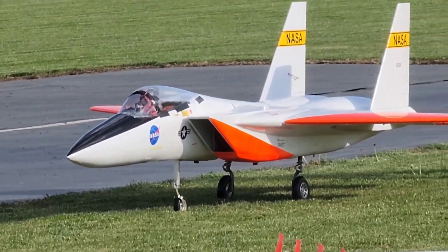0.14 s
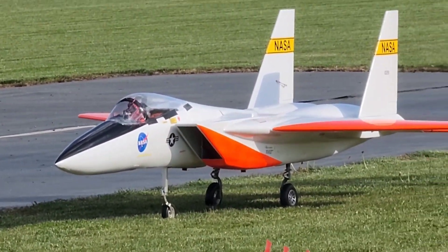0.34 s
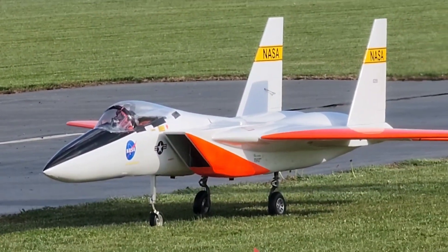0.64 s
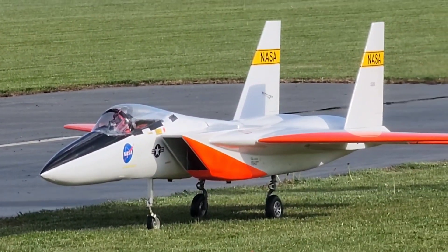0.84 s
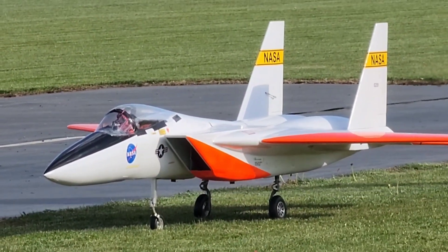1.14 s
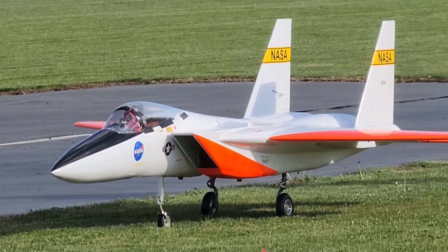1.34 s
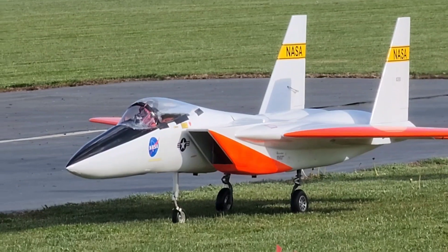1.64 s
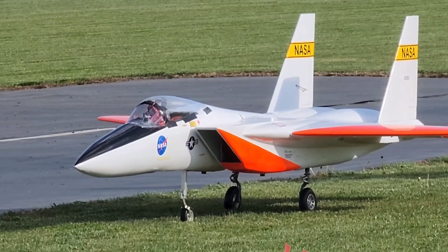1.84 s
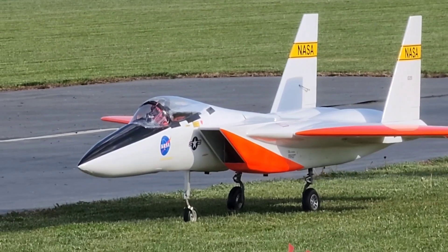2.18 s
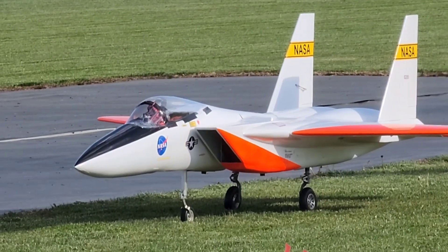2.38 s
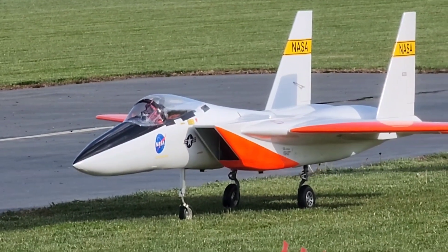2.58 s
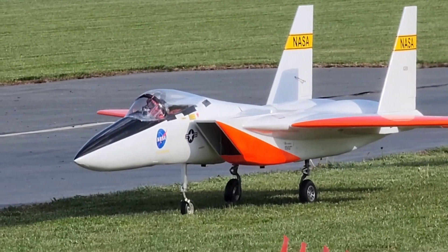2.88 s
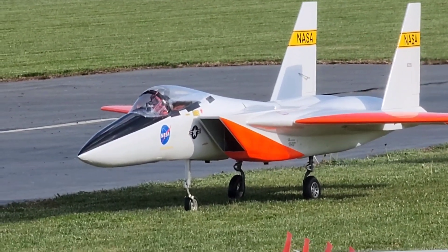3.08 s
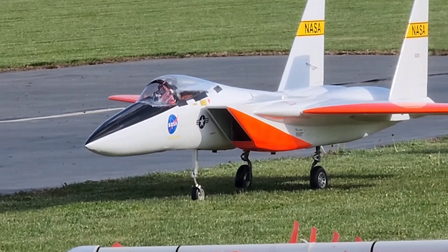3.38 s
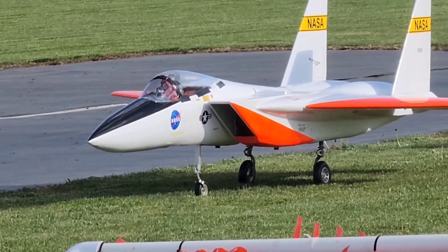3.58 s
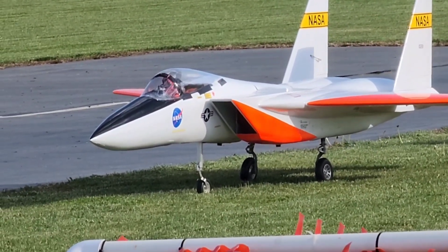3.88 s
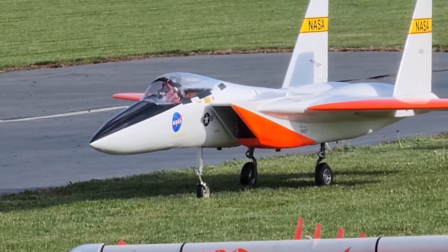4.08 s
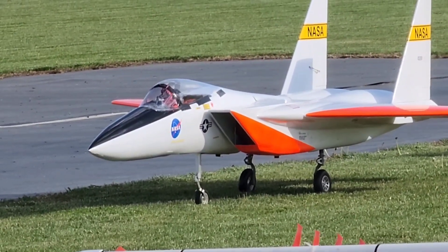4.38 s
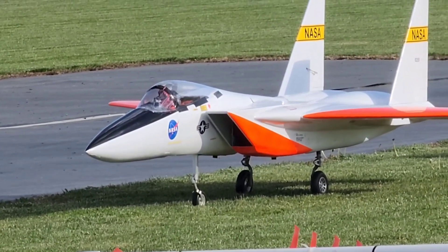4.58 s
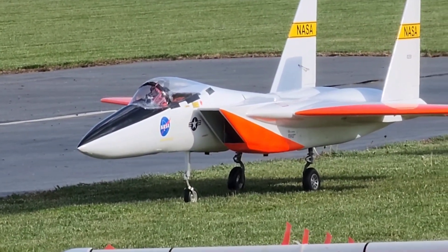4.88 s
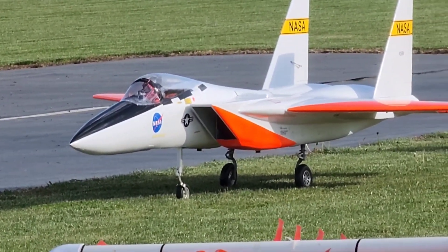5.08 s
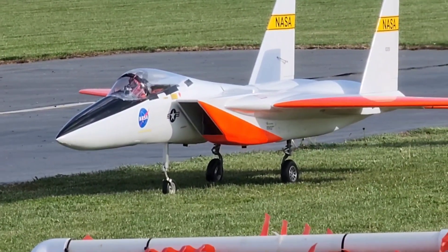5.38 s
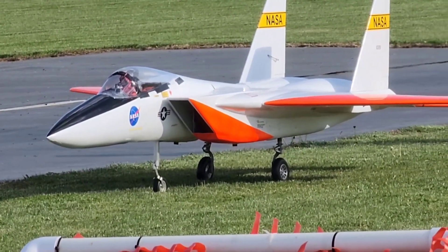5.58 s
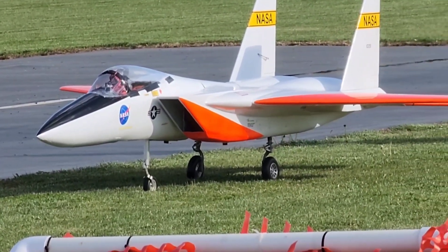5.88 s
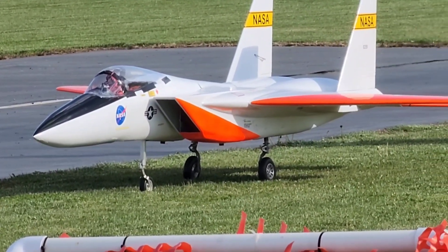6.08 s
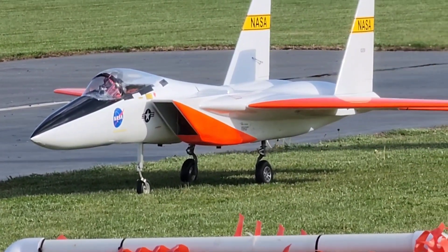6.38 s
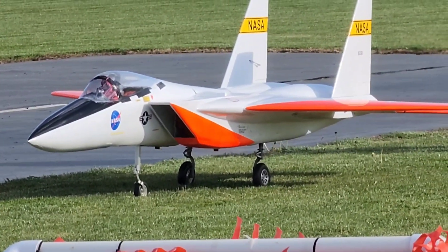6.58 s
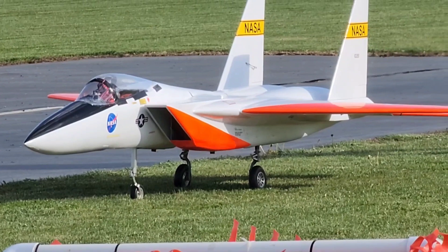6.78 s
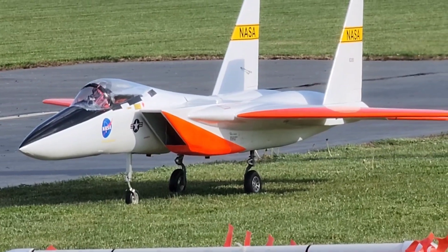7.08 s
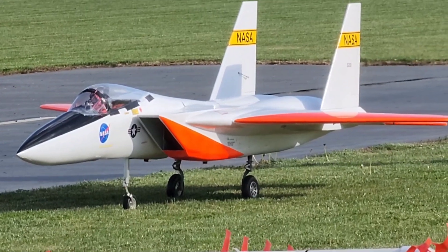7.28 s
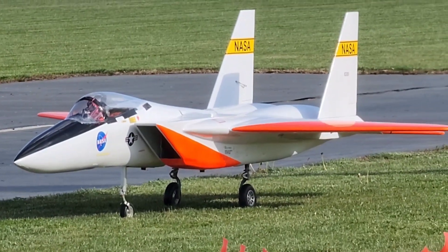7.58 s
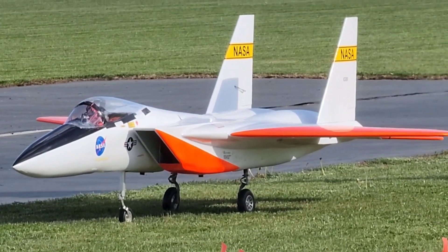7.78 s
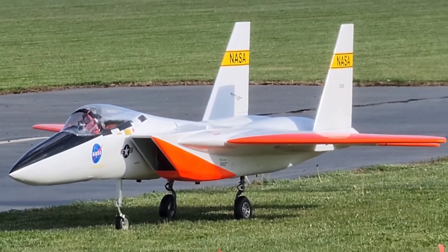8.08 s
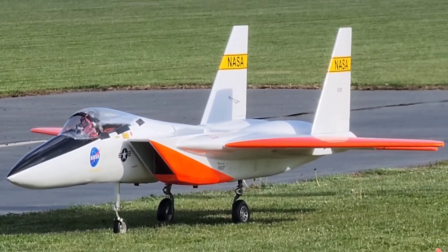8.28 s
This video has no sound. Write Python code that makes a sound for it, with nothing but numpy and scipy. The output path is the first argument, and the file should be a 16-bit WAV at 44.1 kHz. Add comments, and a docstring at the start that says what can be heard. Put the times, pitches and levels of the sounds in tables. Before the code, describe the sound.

Continuous small-turbine noise outdoors: a piercing, wavering high whine, dipping slightly then slowly creeping upward, above breathy roar and hiss. A light breeze quickly gives way to repeated gusts that batter the handheld stereo microphone with deep, ragged flutters and thuds, mostly on the right. A weak low hum wavers underneath. No start or stop; the jet stays at steady power.

```python
"""Twin-turbine model jet at taxi power

A jet on an airfield, heard through the two ports of a hand-held stereo microphone.
Two blade-passing tones near 11 kHz drift past each other and beat, over filtered-noise exhaust rush.
Noise gusts, buffets and short eddies shake the ports; low wavering harmonics form a generator hum.
"""
import sys
import numpy as np
from scipy import signal
from scipy.fft import rfft, irfft
from scipy.io import wavfile
from scipy.ndimage import uniform_filter1d, minimum_filter1d, map_coordinates

SR = 44100
rng = np.random.default_rng(int(sys.argv[2]) if len(sys.argv) > 2 else 0)


def to_wav(sig):
    """Store sig (one row per channel, or 1-D mono) as 16-bit WAV at the path in sys.argv[1].

    Samples outside -1..1 are clipped; the rate is SR.
    """
    pcm = np.clip(np.atleast_2d(sig), -1, 1) * 32767
    pcm = np.round(pcm).astype(np.int16)
    wavfile.write(sys.argv[1], SR, pcm.T)  # frames by channels


N = 372204
TIME_S = np.arange(N) / SR
FREQS_HZ = np.fft.rfftfreq(N, 1 / SR)

# Mean blade-passing tone, first and second turbine: (time [s], frequency [Hz])
BLADE_TONE_A = [(0, 10790), (.38, 10720), (.6, 10745), (.85, 10805), (1.5, 10905), (2.05, 10964),
                (2.6, 10983), (3.0, 10974), (3.28, 10952), (4.05, 10961), (4.4, 10972), (5.7, 11030),
                (6.3, 11066), (6.9, 11092), (7.5, 11092), (8.3, 11107), (8.44, 11150)]
BLADE_TONE_B = [(0, 10878), (.6, 10838), (1.03, 10822), (1.5, 10885), (2.1, 10947), (2.5, 10973),
                (3.4, 10984), (3.9, 10963), (4.8, 10948), (5.35, 10968), (6.3, 10984), (7.5, 10970),
                (8.3, 10988), (8.44, 11035)]
# Narrow whistle beam swinging over the ports, before trim and flutter:
# (time [s], left level [dB], right level [dB], phase lead of left port [rad])
BEAM_A = [(0, -33, -35, -2.5), (.35, -41, -38, 1.5), (.6, -23, -25, -3), (1.2, -37, -30, -1.5),
          (1.6, -27, -29.5, -0.5), (2.25, -24.5, -26, -3), (2.7, -20.5, -28, -1.9), (3.02, -34.5, -24, 0.5),
          (3.62, -17.5, -26, -2.4), (4.0, -41, -28, -1.5), (4.5, -19.5, -32, -2), (5.1, -32.5, -25, 1.5),
          (5.6, -25, -22.5, -0.3), (6.3, -20.5, -31, -2.2), (7.7, -10.5, -21, -1.8), (8.15, -21, -30, 3.3),
          (8.44, -21, -18, 1.3)]
BEAM_B = [(0, -34.5, -26, -2.5), (.4, -33, -24.5, -1.4), (.72, -28.5, -19, 0.9), (1.05, -37, -27, -0.2),
          (1.65, -30, -30, -1.9), (2.05, -21, -34, -2.5), (2.5, -32, -32, -2.5), (2.9, -28.5, -32, 1.5),
          (3.6, -27, -41, -1), (3.95, -21.5, -25.5, -.6), (4.3, -28, -40, -0.5), (5.5, -25.5, -24, -2),
          (6.4, -27.5, -29, -2.1), (7.25, -49, -47, -0.5), (7.9, -26.5, -27, -3.5), (8.44, -22.5, -30, 2)]
# First turbine's weaker tones, left port: (time [s], half-blade tone [dB], each tone above blade tone [dB])
SHAFT_LEVEL = [(0, -50, -62), (.4, -45, -60), (1.0, -52, -59), (1.8, -52, -53), (4.2, -48.5, -43),
               (5.5, -47, -59), (7.6, -36, -55), (8.44, -37.5, -58)]
# Intake and tailpipe resonances: (centre [Hz], width scale [Hz], left peak [dB per Hz], right peak [dB per Hz])
DUCTS = [(192, 205, -61, -60), (875, 165, -59, -59), (1396, 54, -54.5, -55.5), (1503, 187, -60.5, -67),
         (2017, 310, -59, -65.5), (2393, 152, -60, -82), (2890, 178, -60.5, -66), (3092, 120, -61, -69.5),
         (3398, 193, -63.5, -63.5), (3955, 290, -67, -67.5), (4384, 99, -70, -67), (4890, 430, -67.5, -70),
         (5565, 220, -66, -67.5), (6200, 460, -65.5, -63), (6620, 250, -63, -71.5),
         (7260, 390, -64.5, -61.5), (7885, 550, -70.5, -69.5), (9130, 220, -75, -75.5),
         (11650, 370, -73, -78.5), (12900, 370, -82, -92)]
# Broad jet rush under the resonances: (frequency [Hz], left density [dB per Hz], right density [dB per Hz])
RUSH = [(100, -53.5, -56.5), (500, -72, -73.5), (1536, -61.5, -61.5), (4000, -102, -96), (8500, -98, -81.5),
        (10100, -78, -78.5), (13030, -72.5, -72), (13900, -79, -94), (15900, -88, -92)]
# Slow swell of jet noise: (time [s], low growl [dB], exhaust roar [dB], intake hiss [dB])
FLOW = [(0, 3, 2.5, 0.8), (.28, -1, 5, -0.2), (.75, 0.5, -0.5, 3), (1.1, .6, 3, 0.5), (1.35, 2, -1.2, 0.4),
        (2.3, 1, -.5, -2), (3.0, 2, 0.4, 1), (3.6, 0.5, -0.5, -0.6), (4.25, 0.7, -.2, -0.6),
        (4.75, 1, 1.5, 0.9), (5.45, -1, 0, -1), (6.15, -0.5, -0.8, 0.5), (6.75, -1.5, 0.3, -0.3),
        (7.3, -0.5, -0.5, -0.5), (7.75, -2, 3.5, 2.5), (8.44, -0.5, 2.5, 1)]
# Correlation of jet noise between ports: (frequency [Hz], likeness [0-1])
JET_LIKENESS = [(100, 0.68), (500, 0.79), (900, 0.8), (1700, 0.59), (2200, 1), (2650, 0.47), (3400, 0.82),
                (4300, 0.92), (5300, 0), (6200, 0.86), (7400, 0.94), (8800, 0.5), (12000, 0.05),
                (15000, 0.3)]
# Jet noise phase: (frequency [Hz], lead of left port [rad])
JET_LEAD = [(200, -0.63), (700, -0.034), (1080, 2.07), (1400, 0.68), (1750, 1.32), (2300, 0.4),
            (3050, -1.56), (3450, -0.79), (4200, -0.099), (5000, -1.2), (6000, -0.3), (7300, -0.52),
            (9000, 2.1), (13500, 0.029)]
# Generator harmonics, relative: (multiple of generator frequency [-], level [dB])
HUM = [(1, -36), (2, -29.5), (3, -48.5), (4, -63), (5, -50)]
# Generator swell, added to the harmonics: (time [s], gain [dB])
HUM_SWELL = [(0, -4), (.7, -5.5), (1.6, -2), (2.7, -4), (3.5, 5), (5, 5), (6.3, 6.5), (7.2, -1), (8.44, 5)]
# Gusts, before wind trim: (start [s], end [s], left level [dB], right level [dB])
GUSTS = [(0.774, 1.4, -16.5, -23), (1.84, 2.35, -15, -17.5), (3.16, 5.068, -17.5, -16.5),
         (5.04, 5.81, -19.5, -19), (5.89, 7.098, -17, -17.5), (7.353, 8.6, -16, -21)]
# Flow breaking away at the windward right port within a gust: (start [s], end [s], level [dB])
BUFFETS = [(0.838, .92, -14), (1.02, 1.134, -9.5), (1.94, 2.106, -8), (2.173, 2.27, -10),
           (3.157, 3.35, -17.5), (3.511, 3.864, -7.5), (4.082, 4.48, -9), (4.578, 4.894, -10.5),
           (4.988, 5.05, -12), (5.46, 5.538, -10.5), (5.607, 5.702, -8.5), (6.052, 6.147, -14.5),
           (6.489, 6.597, -10.5), (6.695, 6.807, -9.5), (6.842, 7.057, -9.5), (7.307, 7.447, -7.5),
           (7.605, 7.715, -7), (7.77, 7.937, -7), (7.99, 8.12, -10), (8.293, 8.398, -6)]
# Wind colour, relative: (frequency [Hz], left density [dB per Hz], right density [dB per Hz])
WIND_COLOUR = [(12, -36, -25), (25, -31, -13), (40, -5.5, -3), (55, 2.5, .5), (101.5, -3, 4),
               (155, -7.5, -3.5), (216, -22.5, -14.5), (322, -24.5, -22), (388, -43, -34.5),
               (600, -45.5, -40), (1200, -64, -64), (3000, -85, -84)]
# Strong brief eddies, before trim: (centre time [s], length [s], left level [dB], right level [dB])
EDDIES = [(1.012, 0.087, -30, -17), (1.387, 0.076, -39, -28), (1.939, .034, -22, -7.5),
          (2.334, .022, -25, -36), (3.172, .04, -33, -26), (3.706, 0.058, -28, -16),
          (4.727, 0.045, -34, -20.5), (6.864, 0.037, -33, -21), (7.393, 0.083, -38, -20.5),
          (7.45, 0.015, -27, -15), (7.62, .037, -33, -16), (7.835, .019, -28, -18),
          (8.048, 0.053, -32, -16), (8.297, .04, -31, -16.5)]
# Eddy colour, relative: (frequency [Hz], density [dB per Hz])
EDDY_COLOUR = [(60, -14), (170, 7.5), (300, -0.5), (420, -11.5), (600, -14), (1100, -21), (1600, -28),
               (5000, -76)]

BLADES = 12
GENERATOR_HZ = 59.04
CALM_LEFT_DB, CALM_RIGHT_DB = -28, -30
GUST_RISE_S, GUST_FALL_S = .025, .012
BUFFET_RISE_S, BUFFET_FALL_S = .01, .021
# small eddies shed by every buffet; level relative to the buffet
SHED_PER_S, SHED_LENGTH_S, SHED_DB, SHED_SPREAD_DB = 11, .018, -16, 5.5
MIRROR_HZ, EDGE_HZ, CEILING = 24000, 15850, .99


def amp(db):
    """Decibels to gain."""
    return 10 ** (np.asarray(db) / 20)


def unit(x):
    """Scales to an overall rms of 1."""
    return x / np.sqrt(np.mean(x ** 2) + 1e-20)


def curve(rows):
    """Columns of a time table, at every sample."""
    time_s, *columns = np.transpose(rows)
    return np.array([np.interp(TIME_S, time_s, c) for c in columns])


def spectrum(rows):
    """Columns of a frequency table, at every bin, on a log axis."""
    hz, *columns = np.transpose(rows)
    return np.array([np.interp(np.log(FREQS_HZ + 1), np.log(hz + 1), c) for c in columns])


def drift(rate_hz, channels=1):
    """Slow random signal of rms 1, rolling off above the given rate."""
    white = rfft(rng.standard_normal((channels, N)))
    return unit(irfft(white / (1 + (FREQS_HZ / rate_hz) ** 2), N))


def noise_pair(likeness):
    """Spectra of white noise at two ports with the given correlation."""
    a, b = rfft(rng.standard_normal((2, N)))
    likeness = np.clip(likeness, -1, 1)
    return np.array([a, likeness * a + np.sqrt(1 - likeness ** 2) * b])


def shaft_angle(blade_tone, wobble_hz=3, rate_hz=7):
    """Angle [rad] of a rotor whose speed trembles slightly; wobble is rms at the blade tone."""
    blade_hz = curve(blade_tone)[0] + wobble_hz * drift(rate_hz)[0]
    return 2 * np.pi * np.cumsum(blade_hz) / SR / BLADES


def whistle(angle, beam, fade_db=1.45, fade_hz=5, flutter_db=0.8, shimmer_rad=0.11, shimmer_hz=60):
    """Blade-passing tone; moving air fades it and shakes its level and phase at each port."""
    left_db, right_db, lead_rad = curve(beam)
    level_db = np.array([left_db, right_db])
    level_db = level_db + fade_db * drift(fade_hz, channels=2)
    level_db = level_db + flutter_db * drift(16, channels=2)
    phase_rad = lead_rad * np.array([[.5], [-.5]])
    phase_rad = phase_rad + shimmer_rad * drift(shimmer_hz, channels=2)
    return np.sqrt(2) * amp(level_db) * np.sin(BLADES * angle + phase_rad)


def shaft_tones(angle, flutter_db=2.0, upper_flutter_db=2.5, half_right_db=-1, upper_right_db=-3):
    """Unequal blades add faint tones at other multiples of the shaft rate."""
    half_db, upper_db = curve(SHAFT_LEVEL)
    half = amp(half_db + flutter_db * drift(16)) * np.sin(BLADES / 2 * angle)
    upper = 0
    for k in (1, 2):
        level = amp(upper_db + upper_flutter_db * drift(9))
        upper = upper + level * np.sin((BLADES + k) * angle)
    # right port relative to left
    return np.sqrt(2) * (half * amp([[0], [half_right_db]]) + upper * amp([[0], [upper_right_db]]))


def turbines(trim_a_db=-0.16, trim_b_db=0.4):
    """Two rotors at nearly the same speed: their whistles beat."""
    first, second = shaft_angle(BLADE_TONE_A), shaft_angle(BLADE_TONE_B)
    whistles = amp(trim_a_db) * whistle(first, BEAM_A) + amp(trim_b_db) * whistle(second, BEAM_B)
    return whistles + shaft_tones(first)


def waver(x, depth, rate_hz=5):
    """Moving air stretches and squeezes a sound (rms fraction), so its resonances wander."""
    stretch = depth * drift(rate_hz)[0]
    place = np.arange(N) + np.cumsum(stretch - stretch.mean())
    return np.array([map_coordinates(port, [place], order=3, mode="mirror") for port in x])


def jet_noise(growl_top_hz=1120, roar_top_hz=3000, growl_waver=.025, roar_waver=.014, hiss_waver=.005,
              flicker_db=0.32, level_db=0.02):
    """Turbulent flow coloured by the ducts; growl, roar and hiss swell and waver separately."""
    power = amp(spectrum(RUSH)) ** 2
    for hz, width_hz, left_db, right_db in DUCTS:
        resonance = 1 / (1 + ((FREQS_HZ - hz) / width_hz) ** 2) ** 3
        power = power + amp([[left_db], [right_db]]) ** 2 * resonance
    under_growl = 1 / (1 + (FREQS_HZ / growl_top_hz) ** 16)
    under_roar = 1 / (1 + (FREQS_HZ / roar_top_hz) ** 16)
    shares = under_growl, abs(under_roar - under_growl), 1 - under_roar
    depths = growl_waver, roar_waver, hiss_waver
    out = np.zeros((2, N))
    for share, depth, swell_db in zip(shares, depths, curve(FLOW)):
        bins = noise_pair(spectrum(JET_LIKENESS)[0]) * np.sqrt(share * power * SR / 2)
        bins[0] *= np.exp(1j * spectrum(JET_LEAD)[0])
        out += waver(irfft(bins, N), depth) * amp(level_db + swell_db + flicker_db * drift(39))
    return out


def patches(x, depth_db=2.0):
    """Uneven grain in the jet rush: random gain in small patches of time and frequency."""
    bins = signal.stft(x, nperseg=2048, noverlap=1536)[2]
    field = rng.standard_normal(bins.shape[1:])
    field = uniform_filter1d(field, size=4, axis=0)  # over frequency
    field = uniform_filter1d(field, size=9, axis=1)  # over time
    gain = unit(amp(depth_db * unit(field)))
    return signal.istft(bins * gain, nperseg=2048, noverlap=1536)[1][:, :N]


def generator(wander=0.01193, flutter_db=3.5):
    """A distant engine: a few low harmonics; speed (rms fraction) and levels waver."""
    speed_hz = GENERATOR_HZ * (1 + wander * drift(3.3)[0])
    angle = 2 * np.pi * np.cumsum(speed_hz) / SR
    hum = 0
    for k, db in HUM:
        level = amp(db + flutter_db * drift(7.0))
        hum = hum + level * np.sin(round(k) * angle + 2 * np.pi * rng.random())
    return np.sqrt(2) * hum * amp(curve(HUM_SWELL))


def swell(start_s, end_s, rise_s, fall_s):
    """Rises around the start, holds near 1, falls around the end."""
    rise = 1 + np.tanh((TIME_S - start_s) / rise_s)
    fall = 1 - np.tanh((TIME_S - end_s) / fall_s)
    return rise * fall / 4


def wind_strength_db(restless_db=2.5, restless_hz=5):
    """Power sum at each port: restless light breeze, gusts, and buffets on the windward right."""
    calm_db = np.array([[CALM_LEFT_DB], [CALM_RIGHT_DB]])
    power = amp(calm_db + restless_db * drift(restless_hz)) ** 2
    for start_s, end_s, left_db, right_db in GUSTS:
        power += (amp([[left_db], [right_db]]) * swell(start_s, end_s, GUST_RISE_S, GUST_FALL_S)) ** 2
    for start_s, end_s, db in BUFFETS:
        power[1] += (amp(db) * swell(start_s, end_s, BUFFET_RISE_S, BUFFET_FALL_S)) ** 2
    return 10 * np.log10(power)


def wind(level_db=0.42, likeness=0.38, split_hz=190, brighten=0.38, lumps_db=3.5, steadiness=0.52,
         flap_db=1.3):
    """Pressure lumps at each port; stronger gusts shed smaller eddies and sound brighter."""
    bins = noise_pair(likeness) * amp(spectrum(WIND_COLOUR))
    low = 1 / (1 + (FREQS_HZ / split_hz) ** 4)
    gust_db = wind_strength_db()
    excess_db = gust_db - np.percentile(gust_db, 80, axis=1, keepdims=True)
    small_gain = amp(brighten * excess_db + lumps_db * drift(11, channels=2))
    air = irfft(bins * low, N) + small_gain * irfft(bins * (1 - low), N)
    air = np.array([unit(port) for port in air])
    # partly even out the short-term power (82 ms)
    push = uniform_filter1d(air ** 2, size=3600) + 1e-6
    air = air / push ** (np.clip(steadiness, 0, 1) / 2)
    return air * amp(gust_db + level_db + flap_db * drift(20))


def puff(centre_s, length_s):
    """Bell-shaped swell around one moment; length is between its 1/e points."""
    return np.exp(-np.minimum((2 * (TIME_S - centre_s) / length_s) ** 2, 20))


def eddies(level_db=4.5, tear_db=5.0, tear_hz=70):
    """Short, ragged, brighter puffs: a few strong ones, and small ones at random within buffets."""
    air = irfft(noise_pair(0.48) * amp(spectrum(EDDY_COLOUR)), N)
    air = unit(air * amp(tear_db * drift(tear_hz)))
    puffs = np.zeros((2, N))
    for centre_s, length_s, left_db, right_db in EDDIES:
        puffs += amp([[left_db], [right_db]]) * puff(centre_s, length_s)
    for start_s, end_s, db in BUFFETS:
        count = round((end_s - start_s) * SHED_PER_S)
        for place, size in rng.random((count, 2)):
            shed_db = db + SHED_DB + SHED_SPREAD_DB * (2 * size - 1)
            shed = amp(shed_db) * puff(start_s + place * (end_s - start_s), SHED_LENGTH_S)
            puffs[1] = np.maximum(puffs[1], shed)
    return amp(level_db) * air * puffs


def buffeting(most=0.94):
    """The strongest pushes of air flatten softly at the ports."""
    air = wind() + eddies()
    return air / (1 + (air / most) ** 4) ** .25


def scene():
    """Jet, field and wind."""
    return turbines() + patches(jet_noise()) + generator() + buffeting()


def record(dry, mirror_left_db=-23, mirror_right_db=-31):
    """Resampling adds a faint whistle image mirrored about 12 kHz; then limiter and band limit."""
    treble = irfft(rfft(dry) * (abs(FREQS_HZ - 11000) < 400), N)
    mirror = (signal.hilbert(treble).conj() * np.exp(2j * np.pi * MIRROR_HZ * TIME_S)).real
    wet = dry + amp([[mirror_left_db], [mirror_right_db]]) * mirror
    gain = np.minimum(1, CEILING / (abs(wet).max(0) + 1e-9))
    wet = wet * uniform_filter1d(minimum_filter1d(gain, size=900), size=900)
    lowpass = signal.firwin(511, EDGE_HZ, window=("kaiser", 9), fs=SR)
    return signal.oaconvolve(wet, lowpass[None], "same")


dry = scene()
out = record(dry)
to_wav(out)
```